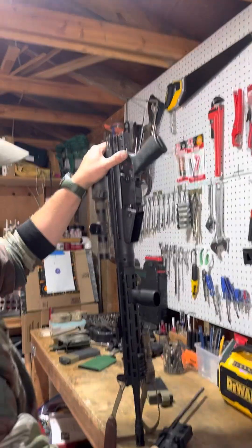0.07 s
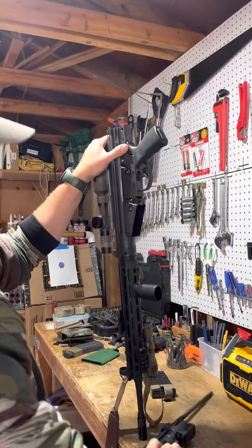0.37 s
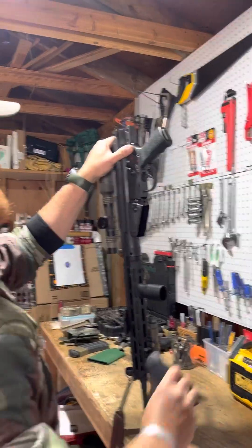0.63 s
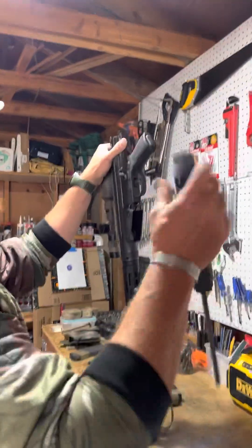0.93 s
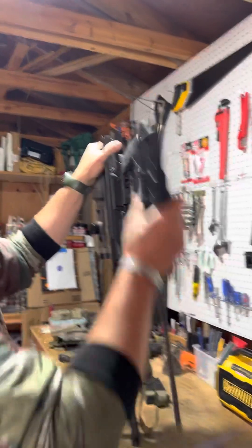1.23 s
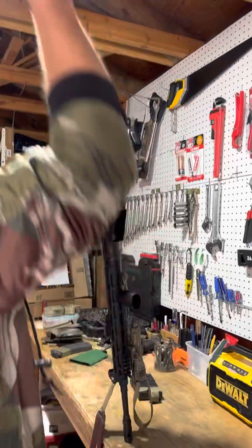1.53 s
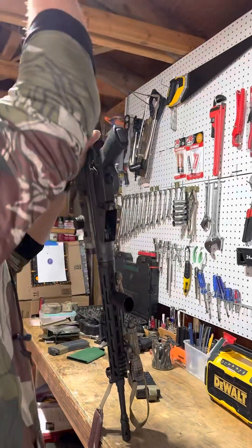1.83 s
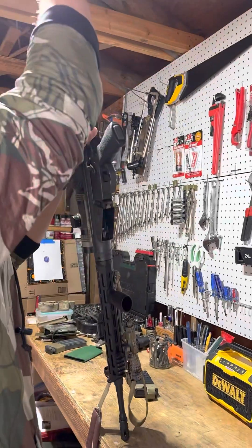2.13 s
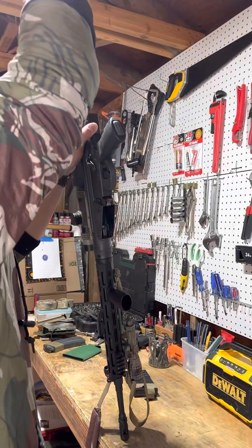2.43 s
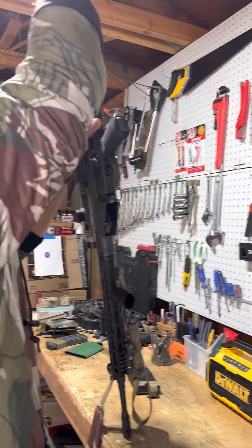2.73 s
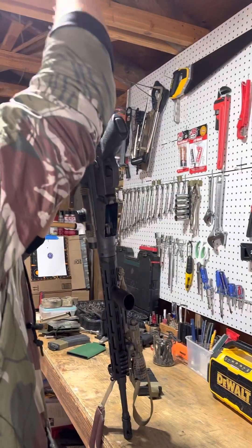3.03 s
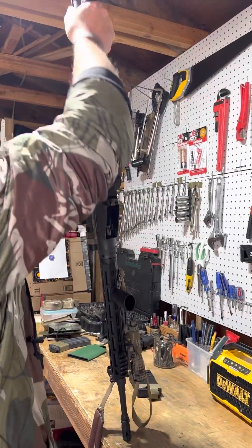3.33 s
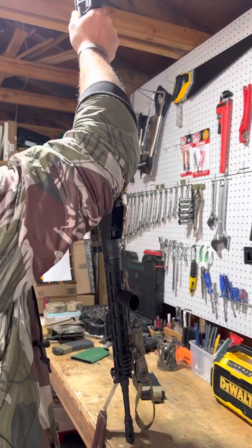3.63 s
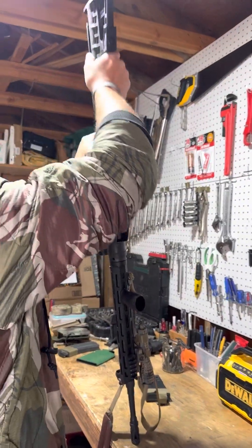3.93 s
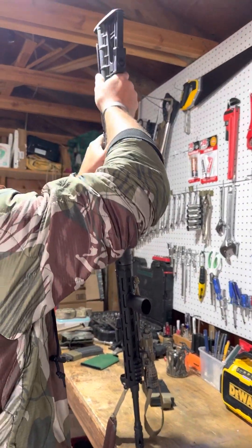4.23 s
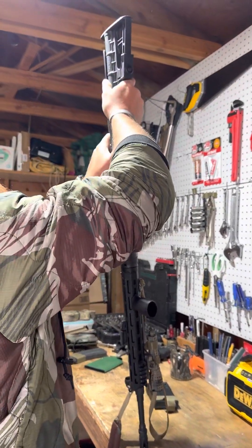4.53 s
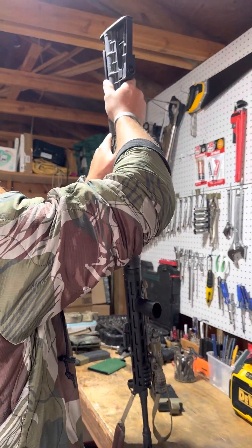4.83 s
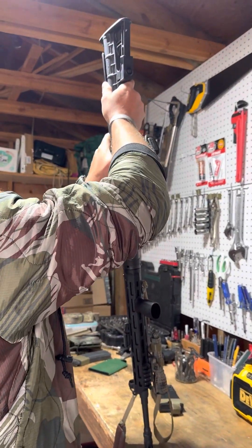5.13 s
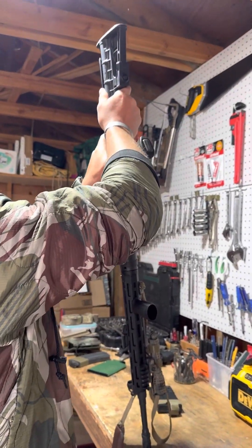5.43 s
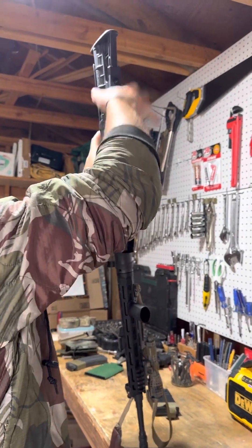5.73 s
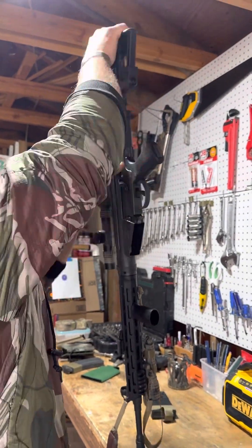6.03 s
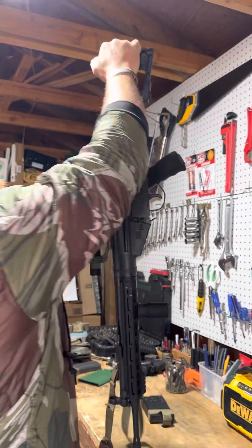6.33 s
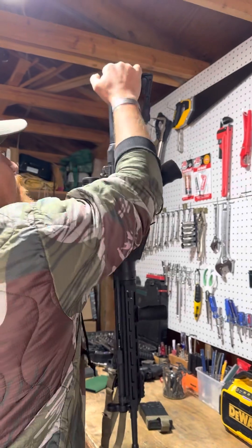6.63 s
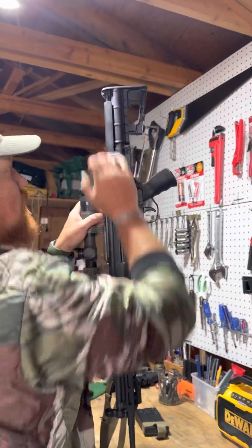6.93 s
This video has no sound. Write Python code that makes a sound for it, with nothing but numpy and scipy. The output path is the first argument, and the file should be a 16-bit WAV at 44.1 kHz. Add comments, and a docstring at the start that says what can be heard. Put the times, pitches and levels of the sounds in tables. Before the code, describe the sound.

At about 0.3 seconds a plastic stock is dragged off a wooden workbench with a short, loud, juddering scrape and a knock. A bright click follows at 1 second, then soft ticks, sleeve rustle and a few very faint squeaks as the parts are handled. Small clacks gather between 2.6 and 3 seconds. At 3.3 seconds the stock goes onto the rifle with a brief sliding hiss and a sharp clack that thumps the bench. More clicks and short slides follow, with firmer clacks and thuds near 4.1 and 4.4 seconds. It grows quieter, with light ticks and clicks around 5.7 and 6 seconds. The stock then glides along its tube with a faint hollow rub and is knocked home at about 6.5 seconds, the loudest hit, with a low thump. Soft rustling ends it. The sound is close, in a small, quiet workshop.

```python
"""A rifle stands muzzle down on a wooden workbench in a small workshop. First a plastic stock is dragged
off the bench, its friction ringing the top, and clicks in the hand. From about 3 s it slides onto the
rifle's tube and clacks through its latch positions; each push travels down the barrel and thumps the bench.
Sleeves rustle and faint squeaks pass between the blows. Near 6 s the stock glides down the tube, the air
inside it resonating, and at 6.5 s it is knocked home."""
import sys
import numpy as np
from scipy import signal
from scipy.fft import rfft, irfft, next_fast_len
from scipy.io import wavfile
from scipy.ndimage import uniform_filter1d, map_coordinates

SR = 44100
rng = np.random.default_rng(int(sys.argv[2]) if len(sys.argv) > 2 else 0)


def output_pcm(signal):
    """Save a mono or channel-first signal as 16-bit PCM at the path in sys.argv[1].

    Samples are clipped to [-1, 1] before scaling.
    """
    pcm = np.clip(np.atleast_2d(signal).T, -1, 1) * 32767
    wavfile.write(sys.argv[1], SR, np.round(pcm).astype(np.int16))


N = 316784


def amp(db):
    """Amplitude ratio of a level in decibels."""
    return 10 ** (np.asarray(db) / 20)


def unit(x):
    """Normalisation to rms 1."""
    return x / np.sqrt(np.mean(x ** 2) + 1e-20)


def struck(x):
    """Normalisation of a transient to rms 1 over its first 30 ms."""
    return x / np.sqrt(np.mean(x[..., :round(.03 * SR)] ** 2) + 1e-20)


def along(points, hz):
    """Interpolation of (frequency, value) points on a logarithmic frequency axis."""
    freqs, values = np.transpose(points)
    return np.interp(np.log(hz + 1), np.log(freqs + 1), values)


def coloured(x, tone):
    """Minimum-phase filtering to a (Hz, dB) curve, made causal by folding the cepstrum."""
    size = 2048
    gain = amp(along(tone, np.fft.rfftfreq(size, 1 / SR)))
    cepstrum = irfft(np.log(gain))
    cepstrum[1:size // 2] *= 2
    cepstrum[size // 2 + 1:] = 0
    impulse_response = irfft(np.exp(rfft(cepstrum)))
    return signal.fftconvolve(x, impulse_response)[:len(x)]


def band(x, edges_hz, order=3):
    """Causal Butterworth band-pass filtering."""
    return signal.sosfilt(signal.butter(order, edges_hz, "bandpass", fs=SR, output="sos"), x)


def add(track, start_s, sound):
    """Superposition of a sound on the track."""
    part = track[max(round(start_s * SR), 0):][:len(sound)]
    part += sound[:len(part)]


def wobble(rate_hz):
    """Random modulation: straight lines between Gaussian knots, rate_hz of them a second."""
    knots = rng.standard_normal(int(N * rate_hz / SR) + 4)
    return map_coordinates(knots, [np.arange(N) * rate_hz / SR], order=1)


def strokes(rows, swell_share, release_t60_s):
    """Incoherent addition: strokes swell, hold and die away, and their envelopes sum in power."""
    t, power = np.arange(2 * SR) / SR, np.zeros(N)
    for start_s, length_s, level_db in rows:
        rise = np.sin(np.pi / 2 * np.clip(t / (swell_share * length_s), 0, 1)) ** 2
        fall = amp(level_db - 60 * np.maximum(t - length_s, 0) / release_t60_s)
        add(power, start_s, (rise * fall) ** 2)
    return np.sqrt(power)


def friction(tone, slip_hz, grain_db):
    """Stick-slip friction: noise broken into tiny slips, at rms 1."""
    return unit(coloured(rng.standard_normal(N) * amp(grain_db * wobble(slip_hz)), tone))


def patchy(x, depth_db):
    """Spectral modulation: the colour shifts in patches as folds and fingers catch in turn."""
    spectrum = signal.stft(x, nperseg=512)[2]
    patches = uniform_filter1d(rng.standard_normal(spectrum.shape), size=12, axis=0)
    patches = uniform_filter1d(patches, size=7, axis=1)
    return unit(signal.istft(spectrum * amp(depth_db * unit(patches)), nperseg=512)[1][:N])


def ringing(modes, t, scatter_db, detune, waver, waver_rate_hz, swell_cycles):
    """Damped normal modes: grip shifts them from blow to blow, and loose parts make them waver."""
    hz, db, t60 = np.transpose(modes)[:, :, None]
    level = db + scatter_db * rng.standard_normal(hz.shape)
    hz = hz * (1 + detune * rng.standard_normal(hz.shape))
    knots = rng.standard_normal((len(hz), 256, 2)) @ [1, 1j]  # complex: amplitude and phase both sway
    sway = 1 + waver * np.array([np.interp(t * waver_rate_hz, np.arange(len(k)), k) for k in knots])
    swell = 1 - np.exp(-t * hz / swell_cycles)
    tones = np.real(sway * np.exp(2j * np.pi * (hz * t + rng.random(hz.shape))))
    return np.sum(amp(level - 60 * t / t60) * swell * tones, axis=0)


def room_tail(t, build_s):
    """Diffuse reverberation of energy 1 from walls and rafters, which absorb the top treble."""
    # decay of the room: frequency_hz, t60_s, level_db
    decay = [(100, 0.87, 0.5), (300, 0.079, 2.5), (988, 0.36, -0.5), (4130, 0.33, -1), (7660, 0.29, 1.5),
             (11500, 0.14, 1), (16000, 0.32, -5)]
    decay = np.array(decay)
    hz, age_s, spectrum = signal.stft(rng.standard_normal(len(t)), SR, nperseg=256)
    t60, db = along(decay[:, :2], hz)[:, None], along(decay[:, ::2], hz)[:, None]
    tail = signal.istft(spectrum * amp(db - 60 * age_s / t60), SR, nperseg=256)[1][:len(t)]
    tail *= 1 - np.exp(-t / build_s)
    return tail / np.linalg.norm(tail)


def workshop(x, wet_db):
    """Convolution with the room's response adds a reverberant field to the direct sound."""
    tail = room_tail(np.arange(SR // 2) / SR, build_s=0.0005)
    return x + amp(wet_db) * signal.fftconvolve(x, tail)[:len(x)]


def handling():
    """Friction noise over the room's noise floor: the rifle rumbles, hands rub it, sleeves rustle."""
    # the quiet workshop: rumble_db, middle_db, hiss_db
    floor_db = [-64.5, -76.5, -86.5]
    # the rifle shifts its weight on the bench: start_s, length_s, level_db
    shifts = [(1.005, 0.015, -47.5), (1.95, 0.144, -57.5), (2.3, 0.18, -59), (2.7, 0.32, -57),
              (3.15, 0.15, -49), (3.5, 0.24, -48), (3.8, 0.2, -55.5), (4.2, 0.1, -46.5), (4.5, 0.14, -57),
              (5.06, 0.077, -51), (5.3, 0.088, -52), (5.38, 0.237, -60), (5.82, 0.072, -54),
              (5.98, 0.0648, -56.5), (6.2, 0.16, -57.5), (6.76, 0.134, -48.5), (7.0, 0.223, -60.5)]
    # arm movements: start_s, length_s, rub_db, sleeve_db
    moves = [(0, 0.2, -69.5, -72), (0.627, 0.3, -73, -67), (0.758, 0.16, -75.5, -57.5),
             (1.242, 0.36, -62.5, -67.5), (1.359, 0.17, -81, -62.5), (1.515, 0.37, -69.5, -71),
             (1.919, 0.089, -66.5, -68), (2.078, 0.32, -78, -77), (2.588, 0.032, -67.5, -71),
             (2.723, 0.03, -54.5, -65.5), (2.967, 0.14, -64.5, -70), (3.096, 0.053, -64, -55.5),
             (3.602, 0.025, -46.5, -62), (3.635, 0.2, -59.5, -78), (4.323, 0.038, -54, -66.5),
             (4.504, 0.21, -70.5, -98), (5.351, 0.071, -60.5, -65.5), (5.494, 0.33, -67.5, -67),
             (5.908, 0.16, -67.5, -63), (6.125, 0.058, -65, -55.5), (6.141, 0.19, -68, -70),
             (6.739, 0.037, -57, -54.5), (6.842, 0.19, -67, -70.5), (7.017, 0.13, -63, -67)]
    # spectra of rifle, hand and sleeve: frequency_hz, level_db
    rumble_tone = [(20, -25), (32, -13.5), (46, 5.5), (80, 0.5), (130, 0), (175, -5), (250, -17),
                   (450, -17), (700, -31), (1500, -44.5)]
    rub_tone = [(200, -8.5), (450, 6), (700, -3.5), (1020, -3.5), (1300, -4), (1600, -1), (1950, -6.5),
                (2250, -2), (2700, -4), (3300, -5), (5000, -26)]
    sleeve_tone = [(1500, -13), (3000, -3), (3520, 1.5), (3900, -4), (6200, -0.5), (10000, -4.5),
                   (12500, -13), (15000, -13), (17000, -29)]
    moves = np.array(moves)
    layers = [shifts, moves[:, [0, 1, 2]], moves[:, [0, 1, 3]]]
    rumble, rub, sleeve = [np.hypot(strokes(rows, swell_share=0.45, release_t60_s=0.26), amp(db))
                           for rows, db in zip(layers, floor_db)]
    rumble *= friction(rumble_tone, slip_hz=6.3, grain_db=3.5)
    rub *= patchy(friction(rub_tone, slip_hz=28, grain_db=2.2), depth_db=2)
    sleeve *= patchy(friction(sleeve_tone, slip_hz=700, grain_db=1.5), depth_db=3)
    return rumble + rub + sleeve


def squeaks(climb_hz_per_s=6500, climb_share=0.55, waver_hz=85, scratch_db=3):
    """Frequency and amplitude modulation: thin, scratchy tones climb and level off."""
    # faint squeaks: start_s, length_s, top_hz, relative_db
    events = [(0.85, 0.12, 3505, -65), (1.611, 0.086, 3167, -67), (1.734, 0.1, 3140, -67),
              (2.329, 0.19, 3095, -67), (3.032, 0.08, 3590, -67.5), (5.083, 0.08, 2880, -70)]
    out, waver, scratch = np.zeros(N), waver_hz * wobble(320), amp(scratch_db * wobble(150))
    for start_s, length_s, top_hz, db in events:
        t = np.arange(round(length_s * SR)) / SR
        hz = top_hz - climb_hz_per_s * np.maximum(climb_share * length_s - t, 0)
        hz += waver[round(start_s * SR):][:len(t)]
        swell = np.sin(np.pi * t / length_s) * t / length_s
        add(out, start_s, amp(db) * unit(swell * np.sin(2 * np.pi * np.cumsum(hz) / SR)))
    return amp(-7.5) * workshop(out * scratch, wet_db=-5)


def hollow_air(rise_from_s, pitch_hz=537, rise_hz_per_s=210, width_hz=115):
    """Cavity resonance, leaky and broad: the air in the stock rises in pitch as the tube fills it."""
    hz = pitch_hz + rise_hz_per_s * np.maximum(np.arange(N) / SR - rise_from_s, 0)
    flutter = wobble(2 * width_hz) + 1j * wobble(2 * width_hz)
    return unit(np.real(flutter * np.exp(2j * np.pi * np.cumsum(hz) / SR)))


def glide():
    """Friction and air resonance: the stock sounds hollow as it glides down the tube."""
    # glides: start_s, length_s, relative_db
    glides = [(5.85, 0.36, -61.5), (6.12, 0.38, -59.5)]
    # spectrum of the hollow rubbing: frequency_hz, level_db
    tone = [(300, -11), (470, 1), (580, 5), (720, -6.5), (900, -12.5), (1650, -13), (2300, -2.5),
            (3000, -11), (5000, -20)]
    rub = amp(-3) * friction(tone, slip_hz=60, grain_db=1.5)
    air = amp(-5.5) * hollow_air(rise_from_s=glides[-1][0])
    return strokes(glides, swell_share=0.474, release_t60_s=0.37) * (rub + air)


def slide(stop_s=6.546, stop_db=-28, rise_db_per_s=899.5):
    """Sliding friction: the stock hisses along the tube; the last shove gathers speed up to the stop."""
    # pushes along the tube: start_s, length_s, relative_db
    pushes = [(3.125, 0.16, -41), (3.855, 0.075, -44.5), (3.92, 0.084, -50)]
    # spectrum of the hiss: frequency_hz, level_db
    tone = [(200, -13.5), (450, -10.5), (700, -4.5), (1000, 3), (1400, -4), (2400, -7), (3500, -10),
            (4800, -19.5), (6500, -10.5), (8300, -15), (10500, -18), (12500, -25.5), (15500, -33)]
    to_go_s = stop_s - np.arange(N) / SR
    run_up = (to_go_s > 0) * amp(stop_db - rise_db_per_s * np.abs(to_go_s))
    envelope = strokes(pushes, swell_share=0.33, release_t60_s=0.27) + run_up
    return envelope * patchy(friction(tone, slip_hz=160, grain_db=2), depth_db=3.5)


def drag():
    """Forced vibration: the stock judders over the bench top and drives its resonances."""
    # short pulls: start_s, length_s, relative_db
    pulls = [(0.262, 0.063, -48), (0.284, 0.072, -30), (0.36, 0.025, -22.5), (0.39, 0.16, -33.5),
             (0.465, 0.09, -25.5)]
    # spectrum of the judder: frequency_hz, level_db
    tone = [(60, -39), (100, -18), (170, -6.5), (300, -6.5), (600, -4), (800, -10), (1060, -9),
            (1280, -15.5), (1800, -15), (2500, -18.5), (5000, -34), (10000, -36), (15000, -57)]
    # resonances of the bench top: pitch_hz, width_hz, gain_db
    board = [(176.7, 23, 10.5), (227, 12, 7.5), (284, 16, 0.5), (348.6, 22, 7.5), (442, 20, 13),
             (470, 13, 9), (555.3, 22, 6.5), (600, 26, 8), (740, 29, -3), (805, 24, 2), (927, 39, 8.5),
             (960, 35, 7.5)]
    judder = strokes(pulls, swell_share=0.37, release_t60_s=0.11)
    judder *= friction(tone, slip_hz=260, grain_db=4)
    ring = sum(amp(db) * band(judder, [hz - width / 2, hz + width / 2], order=1)
               for hz, width, db in board)
    return unit(judder + ring) * np.sqrt(np.mean(judder ** 2))  # at unchanged power


def bumps():
    """Damped oscillation: the bench rings briefly on one low note, with a little shudder above it."""
    # dull bumps, deepest under a straight push down: start_s, level_db, pitch_hz, t60_s
    events = [(0.004, -33, 170.4, 0.33), (0.359, -20, 176.5, 0.1), (2.626, -35.5, 64, 0.41),
              (3.625, -36.5, 72.2, 0.46), (4.392, -30, 66, 0.31), (5.071, -44.5, 65, 0.53),
              (6.552, -27, 65.3, 0.36)]
    out, t = np.zeros(N), np.arange(SR // 2) / SR
    for start_s, db, hz, t60 in events:
        shudder = unit(band(rng.standard_normal(len(t)), [hz * 0.81, hz * 3.4], order=2))
        body = (np.sin(2 * np.pi * hz * t) + amp(-12.5) * shudder) * amp(-60 * t / t60)
        add(out, start_s, amp(db) * band(body, [hz * 0.6, hz * 5], order=2))
    return out


def thump(t, swell_s=0.0026, boom_db=-4, boom_t60_s=0.36):
    """Structure-borne sound: a push runs down the barrel; the cluttered bench shudders and booms."""
    # modes of the bench under the barrel: pitch_hz, level_db, t60_s
    bench_modes = [(65.7, 6, 0.39), (88.5, -8.5, 0.37), (131, -4.5, 0.36), (165.6, -1.5, 0.36),
                   (202, -4, 0.21), (242, -9, 0.3), (280.6, -6.5, 0.37), (344.4, -3, 0.19),
                   (408, -4.5, 0.18), (458, -6.5, 0.24), (517, -9.5, 0.18), (614.5, -6, 0.15)]
    boom = band(rng.standard_normal(len(t)), [60, 520])
    boom *= amp(-60 * t / boom_t60_s) * (1 - np.exp(-t / swell_s))
    top = ringing(bench_modes, t, scatter_db=2.5, detune=0.012,
                  waver=0.55, waver_rate_hz=38, swell_cycles=1.4)
    thud = band(unit(top) + amp(boom_db) * unit(boom), [42, 3000], order=2)
    return thud / np.sqrt(np.mean(thud[:SR // 10] ** 2))


def crack(t, t60_s, press_s=0.0049, chatter_db=4, wet_db=-4.5):
    """Impact noise: loose parts bite, stay pressed and chatter; the room adds a diffuse wash."""
    # spectrum of a bare contact: frequency_hz, level_db
    tone = [(200, -7.5), (1000, 3.5), (2500, 4.5), (4000, 1), (7500, -3), (10000, -6), (12500, -12.5),
            (15000, -15.5), (17000, -30)]
    bite_s = max(0.018 * t60_s, .00005)  # a long contact also starts more softly
    knots_s = np.arange(0, 1, .0007)
    chatter = amp(chatter_db * np.interp(t, knots_s, rng.standard_normal(len(knots_s))))
    force = (1 - np.exp(-t / bite_s)) * amp(-60 * np.maximum(t - press_s, 0) / max(t60_s, .005))
    direct = struck(coloured(rng.standard_normal(len(t)) * chatter * force, tone))
    wash = coloured(room_tail(t, build_s=0.0021), tone)
    return direct + amp(wet_db) * wash * np.linalg.norm(direct) / np.linalg.norm(wash)


def clack(t, ring_hz, ring_db, contact_t60_s, stock_db, steel_db=-15):
    """Impulse response: a contact rings the struck part, damped by the hand, and the stock and latch."""
    # modes of the hollow stock, and of the steel latch and its spring: pitch_hz, level_db, t60_s
    stock_modes = [(635, -11.5, 0.15), (760, -6.5, 0.14), (952, 1, 0.12), (1059, -2.5, 0.11),
                   (1300, -12.5, 0.069), (1540, -6.5, 0.24), (1697, -5.5, 0.18), (1845, -9.5, 0.14),
                   (2505, -6, 0.15), (3070, -10, 0.16), (3600, -14, 0.24)]
    steel_modes = [(3550, -2.5, 0.15), (4530, -4, 0.14), (6400, -1, 0.11), (7250, -0.5, 0.11),
                   (7610, -0.5, 0.12)]
    impact = crack(t, contact_t60_s)
    ring = struck(band(impact, [ring_hz / 1.046, ring_hz * 1.046], order=1))
    stock = struck(ringing(stock_modes, t, scatter_db=1.5, detune=0.0073,
                           waver=0.87, waver_rate_hz=110, swell_cycles=0.87))
    steel = struck(ringing(steel_modes, t, scatter_db=1.5, detune=0.003,
                           waver=0.3, waver_rate_hz=90, swell_cycles=1.5))
    return impact + amp(ring_db) * ring + amp(stock_db) * stock + amp(steel_db) * steel


def contacts(tilt_from_hz=520, tilt_to_hz=9000, snap_t60_s=0.008):
    """Contact stiffness sets brightness: harder blows clack brighter and snap more; all thump the bench."""
    # contacts of stock, latch and rifle (ring and stock levels are relative to the crack): start_s,
    # level_db, thump_db, hardness_db_per_octave, ring_hz, ring_db, contact_t60_s, stock_db
    blows = [(0.3532, -38, -57.5, -10, 3140, 6, 0.01, -19), (0.3697, -21, -52.5, -12, 1013, -5, 0.013, -7),
             (0.388, -31.5, -58, -16, 855, -5.5, 0.0088, -13),
             (0.398, -33, -59.5, -15.5, 990, -2, 0.017, -15.5),
             (0.936, -69, -76.5, -2, 1096, -4.5, 0.021, -11), (1.003, -49.5, -65, 2, 4110, -5, 0.066, -15),
             (1.0135, -46, -60, 0.5, 7560, -10.5, 0.025, -20),
             (1.029, -33, -69, 6.5, 6370, -13.5, 0.049, -10),
             (1.0723, -47.5, -80, 0.5, 1680, -9.5, 0.014, -12.5),
             (1.2266, -70, -91, 0, 3480, 0, 0.019, -11), (1.493, -51, -68.5, 5.5, 3540, 7, 0.037, -17.5),
             (1.881, -55, -57, -2, 3540, -5, 0.041, -1), (1.918, -52.5, -62, -1, 1053, 2.5, 0.099, -3.5),
             (1.988, -64.5, -75, 2.5, 8240, -5, 0.058, -4), (2.616, -53, -63, -2.5, 1230, -5, 0.14, -7),
             (2.6549, -42, -52, 0.5, 6600, -8.5, 0.042, -8),
             (2.8705, -43.5, -66.5, -6, 1070, 0.5, 0.12, 1.5),
             (2.9187, -33, -63.5, -5.5, 1065, 5.5, 0.04, 5), (2.9264, -35, -67, -4.5, 1010, 2, 0.029, 0.5),
             (2.943, -45, -68, -4.5, 1290, 4, 0.05, -1.5), (3.156, -51, -71.5, -4, 1698, -1.5, 0.03, -9),
             (3.3249, -22, -28.5, 0.5, 2490, -6.5, 0.051, -7.5),
             (3.4356, -39, -56.5, -2, 1370, -9.5, 0.04, -4.5),
             (3.452, -43.5, -57, -4.5, 1480, -4, 0.036, -3.5),
             (3.498, -44.5, -44, -6, 4330, -12, 0.031, -8.5),
             (3.6177, -35.5, -58.5, -3.5, 1113, -4, 0.029, -0.5),
             (3.7398, -44.5, -53, -1, 804, -2.5, 0.033, 0.5), (3.755, -46.5, -59, 0, 1100, 1.5, 0.04, -6),
             (3.943, -48, -67, -3.5, 1060, -2, 0.03, -6), (3.981, -52.5, -70, -4.5, 1600, 6, 0.06, -5),
             (4.0718, -25.5, -36, -3.5, 1640, -7, 0.02, -9),
             (4.1429, -39, -48, -4.5, 1460, -0.5, 0.01, -13.5),
             (4.1768, -40.5, -44, -4.5, 1470, -1.5, 0.018, -17.5),
             (4.3828, -29.5, -36.5, -2, 2240, -4, 0.016, -12.5),
             (5.0688, -56, -59.5, -5, 4110, -2.5, 0.035, -0.5),
             (5.312, -50.5, -50.5, -5.5, 7450, -10, 0.018, -6),
             (5.727, -41, -48.5, 1, 6370, -12.5, 0.084, -7),
             (5.991, -41.5, -61, 3.5, 3300, -14, 0.052, -19), (6.498, -56, -67.5, -1.5, 1210, -5, 0.09, -5),
             (6.548, -16.5, -25.5, -1.5, 2025, -10.5, 0.031, -14),
             (6.562, -24.5, -32, -2, 344, -5.5, 0.097, -10)]
    # radiated band, the parts being too small to radiate bass: low_hz, high_hz
    radiated_hz = [202, 16000]
    out, t = np.zeros(N), np.arange(round(.7 * SR)) / SR
    for start_s, db, thump_db, hardness, ring_hz, ring_db, contact_t60_s, stock_db in blows:
        tilt = [(tilt_from_hz, 0), (tilt_to_hz, hardness * np.log2(tilt_to_hz / tilt_from_hz))]
        blow = band(clack(t, ring_hz, ring_db, contact_t60_s, stock_db), radiated_hz)
        blow = struck(coloured(blow, tilt))
        burst = rng.standard_normal(len(t)) * amp(-60 * t / snap_t60_s)  # steel on steel snaps first
        snap = amp(-14 + 1.8 * hardness) * struck(band(burst, [3000, 12500], order=1))
        add(out, start_s, amp(db) * (blow + snap) + amp(thump_db) * thump(t))
    return out


def stereo(mid, scatter_t60_s=0.075):
    """Early reflections off bench and pegboard reach the two sides differently."""
    # scattered sound: frequency_hz, side_to_mid_db
    width = [(60, -38.5), (150, -23), (300, -12), (650, -4.5), (1300, -11.5), (2800, -8.5), (4500, -5),
             (6500, -22.5), (10000, -12.5), (12500, -29.5)]
    t = np.arange(SR // 5) / SR
    echoes = rng.standard_normal(len(t)) * amp(-60 * t / scatter_t60_s)
    side = coloured(signal.fftconvolve(mid, echoes / np.linalg.norm(echoes))[:N], width)
    return np.array([mid + side, mid - side])


def scene():
    """Superposition of all sources, an arm's length in front of the microphones."""
    impacts = contacts() + bumps()
    scrapes = workshop(amp(-6) * drag() + amp(-1) * slide() + glide(), wet_db=-8)
    return stereo(impacts + scrapes + handling() + squeaks())


def record(dry):
    """Phase shift and band limit: the two microphones fall out of phase in the treble."""
    # phase between the microphones: frequency_hz, phase_rad
    phase = [(100, 0), (4000, 0), (4600, -.8), (4950, -2.3), (5350, -.2), (7000, -.1), (8000, -.9),
             (9500, -1.5), (11300, -2.9), (13300, -3.3), (15200, -4.2)]
    top_hz = 16100
    size = next_fast_len(N + 8192)
    hz = np.fft.rfftfreq(size, 1 / SR)
    shift = np.exp(.5j * along(phase, hz) * np.array([[1], [-1]]))
    return irfft(rfft(dry, size) * shift * (hz < top_hz), size)[..., :N]


dry = scene()
out = record(dry)
output_pcm(out)
```